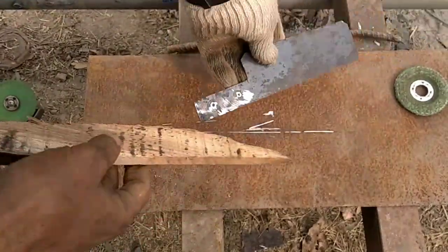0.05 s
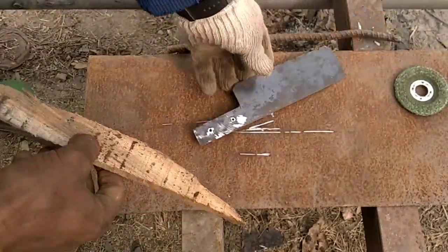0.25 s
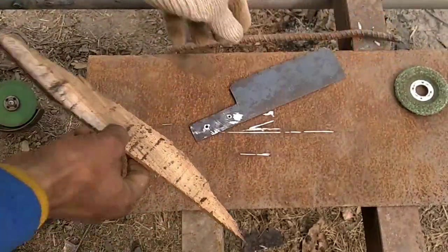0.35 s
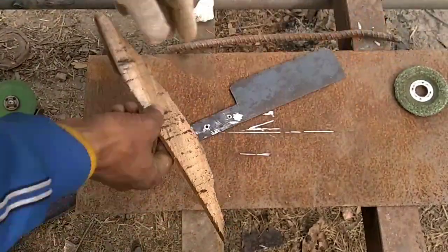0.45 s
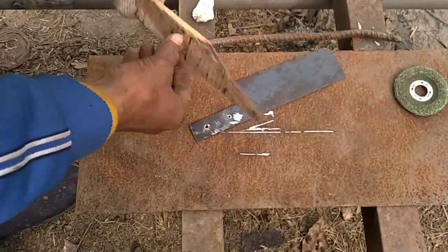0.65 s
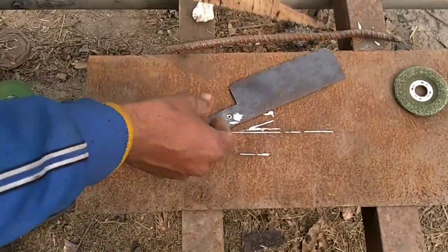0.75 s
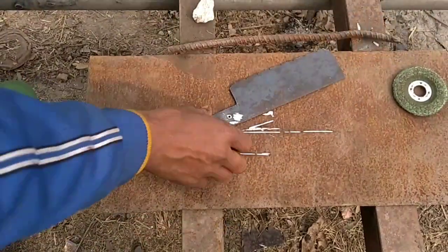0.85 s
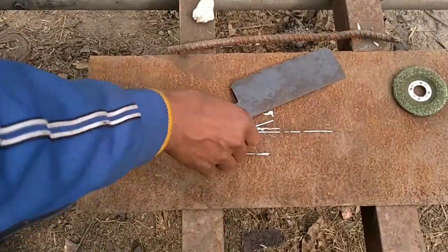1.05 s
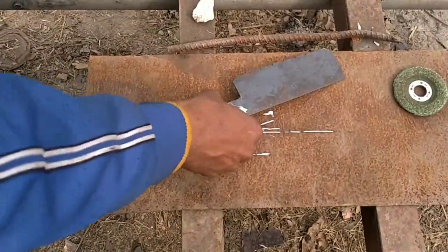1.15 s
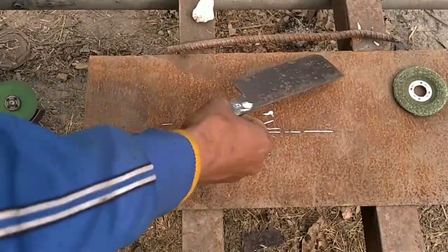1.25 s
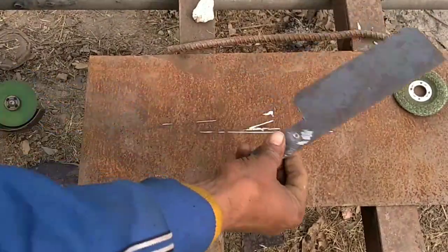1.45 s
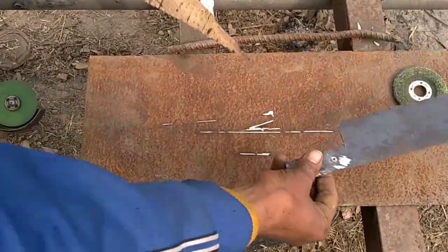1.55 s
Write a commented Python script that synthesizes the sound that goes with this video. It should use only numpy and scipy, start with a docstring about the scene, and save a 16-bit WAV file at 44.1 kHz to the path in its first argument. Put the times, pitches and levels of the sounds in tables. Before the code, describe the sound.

Gritty scraping of a steel blade dropped and slid on a rusty plate, with light taps.

```python
"""Outdoors in a quiet yard, a microphone pair close to a rusty steel plate. A steel blade grazes the
plate, drops flat with a clack and is slid along; rust grains catch it and ring blade and plate.
A sleeve rustles as a hand nudges the blade, which squeaks and taps, then drags its tip as it is lifted.
The yard returns a faint echo throughout, and at the end a small bird calls far away."""
import sys
import numpy as np
from scipy import signal
from scipy.fft import rfft, irfft
from scipy.io import wavfile
from scipy.ndimage import uniform_filter1d

SR = 44100
rng = np.random.default_rng(int(sys.argv[2]) if len(sys.argv) > 2 else 0)


def dump(signal):
    """Clip the signal to [-1, 1] and save it as 16-bit WAV at the path in sys.argv[1]."""
    limited = np.clip(np.atleast_2d(signal).T, -1, 1)
    pcm = np.round(limited * 32767).astype(np.int16)
    wavfile.write(sys.argv[1], SR, pcm)


N = 70560

# bright grit of steel on rust (frequency [Hz], relative level [dB])
GRIT_COLOUR = [(500, -60.5), (1500, -12.5), (2300, -7), (2900, 0.5), (4300, 1.5), (4800, -2.5), (6500, -1),
               (7700, -1), (8300, -17.5), (9800, -14), (12000, -23.5), (15500, -30.5)]


def undb(db):
    return 10 ** (np.asarray(db) / 20)


def unit(x):
    """Scale to an energy of one per channel, on average."""
    return x / np.sqrt(np.sum(x ** 2) / len(np.atleast_2d(x)))


def times():
    return np.arange(N) / SR


def curve(rows, column=1):
    """Gain along rows of (time [s], level [dB]), silent outside them."""
    rows = np.array(rows)
    return undb(np.interp(times(), rows[:, 0], rows[:, column], left=-200, right=-200))


def over_hz(points):
    """Spread rows of (frequency [Hz], value) over the whole spectrum."""
    hz, value = np.array(points).T
    return np.interp(np.log(np.arange(N // 2 + 1) * SR / N + 1), np.log(hz), value)


def ring(x, response):
    """Let x excite an impulse response."""
    return signal.fftconvolve(np.atleast_2d(x), np.atleast_2d(response), axes=1)[:, :N]


def colour(points):
    """Minimum-phase response with the given spectral shape."""
    cepstrum = irfft(np.log(undb(over_hz(points))), N)
    cepstrum[1:N // 2] *= 2
    cepstrum[N // 2 + 1:] = 0
    return unit(irfft(np.exp(rfft(cepstrum)), N))


def noise(points):
    return ring(rng.standard_normal((2, N)), colour(points))


def mic_pair(x, left_lag_s=.0002):
    """Two unrelated signals become a partly alike left and right, the left slightly late."""
    # likeness of the two microphones (frequency [Hz], coherence [0-1])
    likeness = [(100, 0.31), (500, 0.57), (1000, 0.48), (2200, 0.33), (4000, 0.53), (12000, 0.22)]
    coherence = over_hz(likeness)
    a, b = rfft(x)
    mid, side = a * np.sqrt((1 + coherence) / 2), b * np.sqrt((1 - coherence) / 2)
    late = np.exp(-2j * np.pi * np.arange(len(a)) * SR / N * left_lag_s)
    return irfft(np.array([late * (mid + side), mid - side]), N)


def lean(x):
    """The bass is stronger at the right microphone, the treble at the left."""
    # stereo balance (frequency [Hz], left minus right [dB])
    balance = [(60, -19), (140, -22), (260, -18), (500, -8), (1000, -5), (2000, -1.5), (4000, 1.21),
               (8000, 5), (12000, 7)]
    gain = undb(over_hz(balance) * np.array([[.5], [-.5]]))
    return irfft(rfft(x) * gain / np.sqrt(np.mean(gain ** 2, axis=0)), N)


def steel(tone, crack_s=.0012, crack_db=-5, t60_s=.06):
    """A crack and the dense, short ring of steel lying on steel, evened out and then coloured."""
    t = times()
    envelope = undb(crack_db) * unit(np.exp(-t / crack_s)) + unit(undb(-60 * t / t60_s))
    spectrum = rfft(mic_pair(rng.standard_normal((2, N)) * envelope))
    spectrum /= np.sqrt(uniform_filter1d(np.abs(spectrum) ** 2, size=400, axis=1))
    return unit(ring(irfft(spectrum, N)[:, :N // 4], tone[:N * 3 // 4 + 1]))


def modes(table, scatter_rad):
    """Decaying partials; each reaches the two microphones with its own phase."""
    t = times()
    phases = scatter_rad * rng.standard_normal((len(table), 2, 1))
    return unit(sum(undb(db) * unit(np.cos(2 * np.pi * hz * t + phase) * undb(-60 * t / t60))
                    for (hz, db, t60), phase in zip(table, phases)))


def grains(contacts=1, per_s=6000, spread_db=3.5, judder_db=2, judder_hz=109.74):
    """Rust grains catch and let go in juddering bunches: one contact point's share of them."""
    size = undb(spread_db * np.minimum(rng.exponential(size=N), 4)) * rng.choice([-1, 1], N)
    clicks = size * (rng.random(N) < per_s / contacts / SR)
    judder = np.interp(times() * judder_hz, np.arange(N), rng.standard_normal(N))
    return unit(clicks * undb(judder_db * judder)) * np.sqrt(N / contacts)


def scrape(force, points, contacts, body=0):
    """Each rubbing point has its own short ring; all drive the same body, if one is given."""
    tone = colour(points)
    return sum(ring(grains(contacts) * force, steel(tone) + body) for _ in range(contacts))


def whistle(at, half_s, hz, glide, db, waver=.02):
    """A short, slightly unsteady tone that swells and fades."""
    t = times() - at
    wobble = np.interp(times() * 1000, np.arange(N), rng.standard_normal(N))
    pitch = hz * (1 + waver * wobble) + glide * t
    swell = np.sqrt(2) * undb(db) * np.exp(-.5 * (t / half_s) ** 2)
    return swell * np.sin(2 * np.pi * np.cumsum(pitch) / SR)


def air():
    """Faint, steady outdoor air all around the microphones."""
    # background of the yard (frequency [Hz], relative level [dB])
    air_colour = [(15, -57), (25, -32.5), (59, -17), (219, -6.5), (415, -18), (1120, -16.5), (1240, -19.5),
                  (2130, -16), (2370, -23), (3090, -19.5), (4380, -25), (5570, -24), (15000, -56.5)]
    return undb(-63.5) * lean(noise(air_colour))


def graze(plate):
    """One corner of the blade touches first and scrapes dully."""
    # force of the corner (time [s], level [dB])
    touch = [(.199, -60), (.203, -31), (.225, -32), (.26, -27), (.28, -37.5), (.287, -50)]
    # its dull scrape (frequency [Hz], relative level [dB])
    graze_colour = [(50, -48.5), (110, -32.5), (170, -12.5), (245, 1.5), (375, -2), (470, -8), (720, 5.5),
                    (1000, -8), (1800, 1), (2900, 4.5), (3600, 0), (5800, -6.5), (6800, -10.5),
                    (15000, -51.5)]
    return scrape(curve(touch), graze_colour, contacts=2, body=undb(-2) * plate)


def yard(x, t60_s=.6, delay_s=.034, top_hz=6600):
    """Faint, dull echo coming back from the surroundings."""
    t = times()
    tail = rng.standard_normal((2, N)) * undb(-60 * t / t60_s) * (t > delay_s)
    tail = signal.sosfilt(signal.butter(2, top_hz, fs=SR, output="sos"), tail)
    return undb(-30.5) * ring(x, unit(tail))


def slides(blade, held, plate):
    """The blade is dragged over rust: bright grit rings it, the drag rasps and shakes the plate."""
    # one list per stroke (time [s], treble grit [dB], midrange rasp [dB], boom of the plate [dB])
    strokes = [
        [(.281, -27, -14.5, -51), (.287, -23.5, -27.5, -36.5), (.35, -22.5, -26.5, -52),
         (.369, -22.5, -31.5, -31.5), (.378, -17, -33.5, -38), (.44, -21.5, -31, -51.5),
         (.485, -22, -38.5, -40.5), (.52, -27, -38.5, -52), (.552, -28.5, -35, -56), (.575, -26, -38, -46),
         (.605, -35.5, -36.5, -59.5), (.63, -36, -49, -70), (.648, -51.5, -48, -84), (.74, -68.5, -58, -87)],
        [(.888, -70.5, -56.5, -79), (.914, -40, -46, -63), (.919, -28.5, -47.5, -49), (.934, -26.5, -35, -39),
         (.95, -44, -37.5, -43), (.968, -40, -42.5, -61), (.984, -99, -67, -52)],
        [(1.286, -66, -49, -46), (1.292, -46.5, -47, -45), (1.303, -40.5, -43, -71), (1.32, -46, -58, -56),
         (1.342, -69, -53, -70)],
    ]
    # rasp of the drag (frequency [Hz], relative level [dB])
    rasp_colour = [(40, -42.5), (90, -37), (170, -4.5), (260, -2.5), (350, -11), (470, -10.5), (620, 2.5),
                   (820, 0), (1020, -5.5), (1400, 1), (2100, -3.5), (3200, -3.5), (8000, -56)]
    grit, rasp, boom = (sum(curve(stroke, column) for stroke in strokes) for column in (1, 2, 3))
    # the blade rings freely in the first stroke; in the later ones the fingers mute it
    free, gripped = curve(strokes[0]), sum(curve(stroke) for stroke in strokes[1:])
    rubbing = scrape(grit, GRIT_COLOUR, contacts=3) + scrape(rasp, rasp_colour, contacts=2)
    ringing = free * ring(grains(), blade) + ring(grains() * gripped, held)
    return rubbing + undb(-4.5) * ringing + ring(grains() * boom, undb(1) * plate)


def knocks(held, plate, chatter_db=-4):
    """The blade strikes the plate, flat or on edge: a push, then a brief chatter as it settles."""
    # blows (time [s], level [dB], share of flat clack [0-1], relative thud [dB], chatter decay [s])
    blows = [(.2822, -15.5, .97, -10, .001), (.3758, -23, .1, -22, .0015), (.9175, -39, .1, -17, .003),
             (1.058, -35, .03, -25, .008), (1.077, -43, .03, -19, .008), (1.17, -61, .1, -4, .008),
             (1.2885, -42, .15, -3, .004), (1.302, -44, .1, -6, .004)]
    # the blade landing flat (frequency [Hz], relative level [dB])
    clack_colour = [(40, -32), (130, -20), (260, -2), (450, -8), (680, -3), (1100, -7), (1950, -7),
                    (2180, 6), (2600, -3), (3600, -10), (4750, -7), (5150, 3), (5500, -12), (7500, -11),
                    (8400, -23), (15500, -29)]
    # its edge tapping (frequency [Hz], relative level [dB])
    tap_colour = [(80, -12), (250, -19), (750, -5), (1200, -5.5), (2300, -8), (3000, 14.5), (4400, -4),
                  (5300, -1.5), (7200, -4), (8400, -16.5), (15500, -40)]
    t, flat, edge, thud = times(), 0, 0, 0
    for at, db, flat_share, thud_db, chatter_s in blows:
        push = undb(chatter_db) * unit(grains() * (t > at) * np.exp(-np.abs(t - at) / chatter_s))
        push[int(at * SR)] += 1
        push = unit(push) * undb(db) * np.sqrt(.0096 * SR)  # the energy of 9.6 ms at that level
        thud += undb(thud_db) * push
        flat += np.sqrt(flat_share) * push
        edge += np.sqrt(1 - flat_share) * push
    clacks = ring(flat, steel(colour(clack_colour)))
    taps = ring(edge, steel(colour(tap_colour)) + undb(-3) * held)
    return clacks + ring(thud, plate) + taps


def rustle():
    """Sleeve and hand brush softly, close to the microphones."""
    # movement of the arm (time [s], level [dB])
    movement = [(.6, -44), (.68, -61.5), (.8, -64), (.88, -70), (1.0, -54), (1.12, -61), (1.2, -61),
                (1.36, -57.5), (1.46, -61), (1.6, -70.5)]
    # cloth and skin (frequency [Hz], relative level [dB])
    rustle_colour = [(40, -29.5), (100, 15.5), (250, 9.5), (450, -1.5), (750, 8.5), (1200, 0.5), (3500, -2),
                     (7500, -39), (12000, -80)]
    return mic_pair(noise(rustle_colour)) * curve(movement)


def squeak():
    """The edge sticks and slips for a moment, a little to the left."""
    return whistle(at=1.01, half_s=.007, hz=7690, glide=0, db=-54) * undb([[2], [-2]])


def lift(held):
    """The tip drags and sings on the plate as the tang is raised."""
    # drag of the tip (time [s], relative level [dB])
    drag = [(1.205, -53), (1.225, -50.5), (1.233, -42), (1.241, -34.5), (1.252, -55.5), (1.266, -34),
            (1.279, -90)]
    return scrape(undb(-6.5) * curve(drag), GRIT_COLOUR, contacts=1, body=undb(3.5) * held)


def bird():
    """A small bird far off whistles four falling chirps."""
    # chirps (time [s], half length [s], centre pitch [Hz], glide [Hz/s], level [dB])
    chirps = [(1.44, .006, 3050, -4000, -68), (1.493, .008, 3780, -22000, -63),
              (1.51, .005, 3050, -4000, -68), (1.579, .006, 3050, -8000, -69)]
    return sum(whistle(*chirp, waver=.01015) for chirp in chirps)


def scene():
    """Blade, plate and hand up close; behind them the echo, the far bird and the air."""
    # the blade ringing freely (frequency [Hz], relative level [dB], t60 [s])
    blade_modes = [(2560, -10, .18), (2755, -7, .15), (2954, -1, .18), (3245, -4, .22), (3382, -6, .2),
                   (3543, 0, .3), (3613, -5, .25), (3805, -4, .22), (4354, -6, .2), (4540, 0, .3),
                   (5572, -4, .2), (6308, -7, .2), (6570, -7, .2), (7244, -4, .22), (7690, -7, .18)]
    # the blade held by its tang (frequency [Hz], relative level [dB], t60 [s])
    held_modes = [(2840, -3, .07), (2990, -4, .07), (3380, -3, .06), (3840, -2, .08), (4190, 2.5, .08),
                  (4620, 1, .08), (5900, -8, .05), (7160, -6, .06), (7750, -6, .05)]
    # the plate ringing (frequency [Hz], relative level [dB], t60 [s])
    plate_modes = [(118, -19, .6), (172, -15, .25), (238, 1, .24), (284, -1, .22), (358, -8, .22),
                   (700, -4, .2), (842, -11, .25), (1160, -15, .5), (1390, -13, .5)]
    blade = modes(blade_modes, scatter_rad=.7)
    held = modes(held_modes, scatter_rad=1)
    plate = modes(plate_modes, scatter_rad=.071)
    near = slides(blade, held, plate) + graze(plate) + knocks(held, plate)
    near += lift(held) + squeak() + rustle()
    return bird() + undb(2) * lean(near + yard(near)) + air()


def record(dry, bass_hz=55, top_hz=15700):
    """The recorder thins the deepest bass and cuts the top."""
    dry = signal.sosfilt(signal.butter(2, bass_hz, "high", fs=SR, output="sos"), dry)
    return signal.sosfilt(signal.ellip(10, .2, 80, top_hz, fs=SR, output="sos"), dry)


dry = scene()
out = record(dry)
dump(out)
```